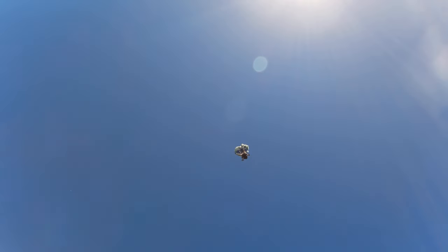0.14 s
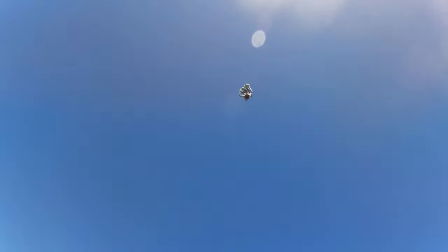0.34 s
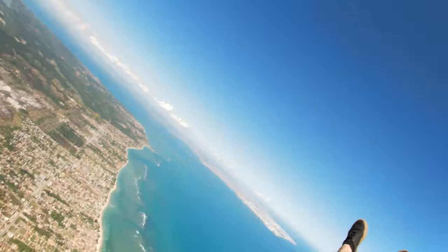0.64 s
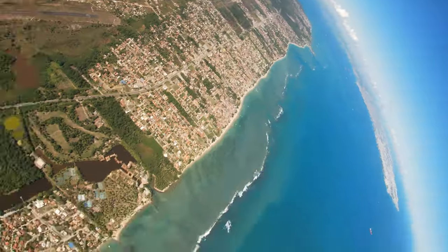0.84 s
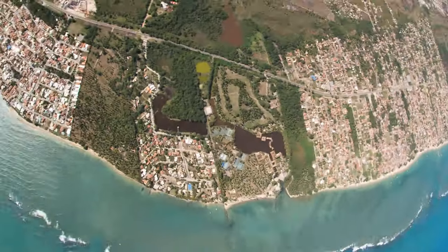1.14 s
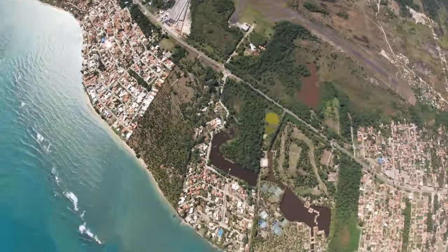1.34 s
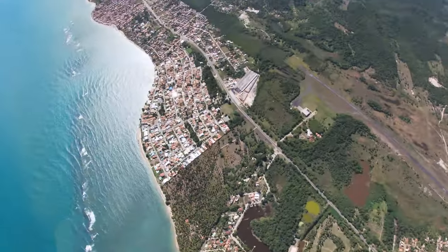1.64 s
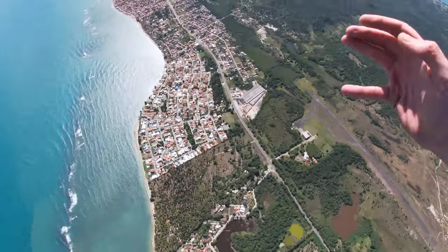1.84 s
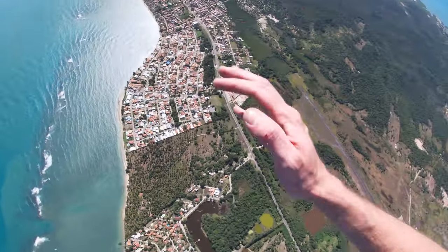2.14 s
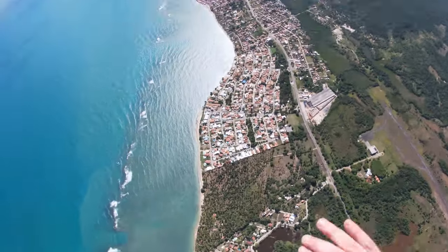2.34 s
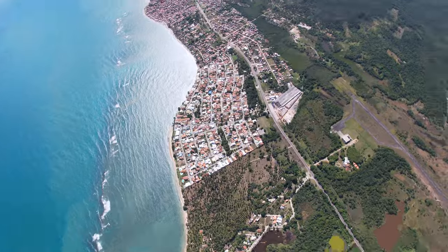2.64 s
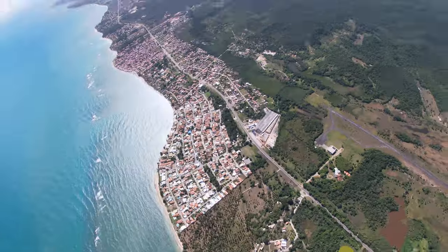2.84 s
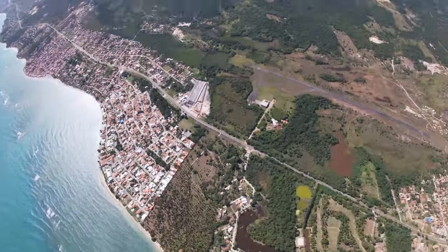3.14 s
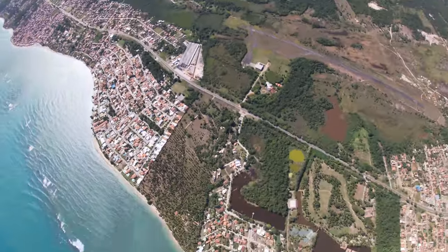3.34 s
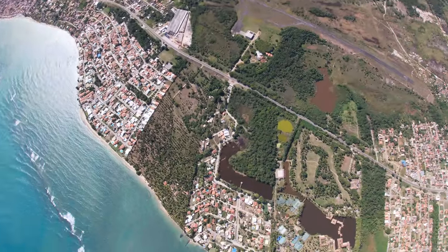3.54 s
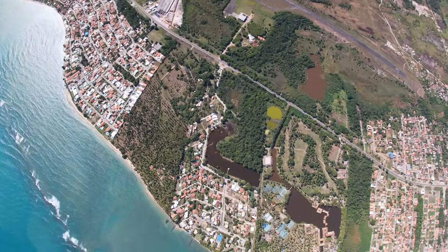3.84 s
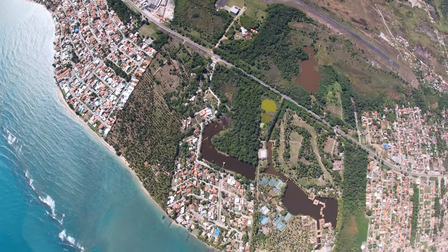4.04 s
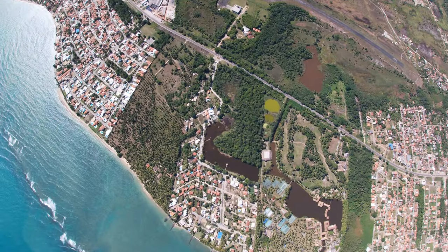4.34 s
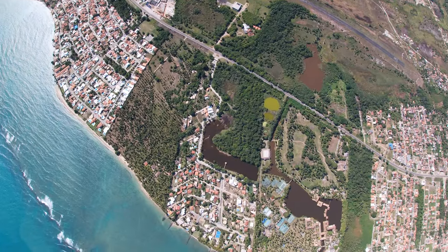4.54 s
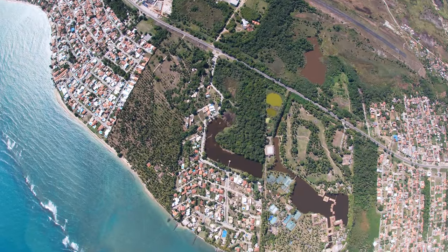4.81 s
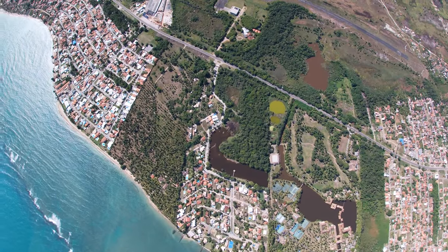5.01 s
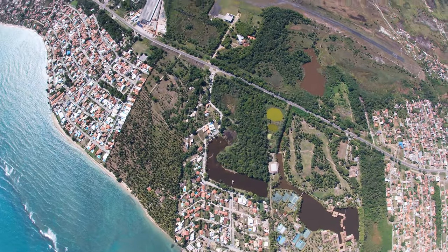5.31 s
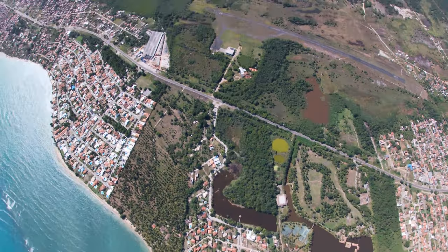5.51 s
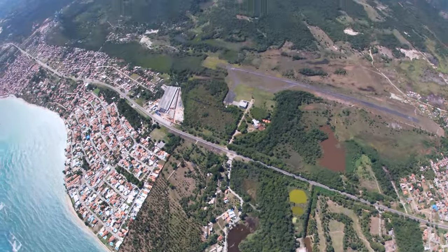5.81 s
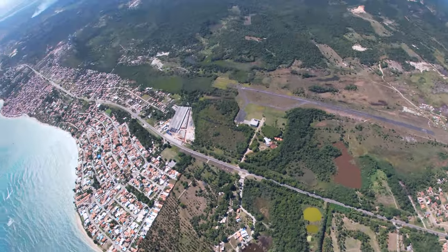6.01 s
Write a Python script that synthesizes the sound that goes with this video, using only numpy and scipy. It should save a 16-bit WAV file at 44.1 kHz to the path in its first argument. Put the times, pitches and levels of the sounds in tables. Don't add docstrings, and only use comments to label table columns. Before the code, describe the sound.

Air tears past a falling skydiver's microphone: rumbling, fluttering gusts, brief hollow moans and whistles, then a fuller, brighter continuous rush.

```python
import sys
import numpy as np
from scipy import signal
from scipy.fft import rfft, irfft, next_fast_len
from scipy.io import wavfile
from scipy.ndimage import uniform_filter1d

SR = 44100
rng = np.random.default_rng(int(sys.argv[2]) if len(sys.argv) > 2 else 0)


def level_to_linear(level):
    exponent = np.asarray(level, float) / 20
    return 10 ** exponent


def transcribe(u):
    v = np.clip(np.atleast_2d(u).T, -1, 1)
    q = np.round(v * 32767).astype(np.int16)
    wavfile.write(sys.argv[1], SR, q)


N = 272097
HOP = 16

# (frequency [Hz], density [dB per Hz])
WIND_SPECTRUM = [(12, -40), (20, -5.5), (92, 5), (201, -1.5), (366, -9), (648, -19), (1630, -28),
                 (2810, -34.5), (6880, -53.5), (12200, -68.5), (13200, -86)]
EDDY_HZ = (100, 350, 1300, 4400)
# (level [dB], share of buffet [dB/dB], of exposure [dB/dB], of lulls [dB/dB], of surges [dB/dB])
EDDIES = [
    (-15, 0.17, 0.11, 1., .02),
    (-18, 1., 0.016, .45, 0.24),
    (-25.5, .35, 0.71, 0.27, 0.98),
    (-36, .02, 0.98, .05, .3),
]
# (time [s], buffet [dB])
BUFFET = [(0, -1), (.25, 1.5), (.5, 4.5), (.86, 1), (.9, -7.5), (1.15, 1.5), (1.4, -6), (1.95, -3.5),
          (2.15, 3), (2.4, -1.5), (2.75, 7.5), (2.97, 4.5), (3.01, -2.5), (3.3, -9), (3.65, -9), (4.3, -2),
          (5.7, -2.5), (6.17, -2)]
# (time [s], exposure [dB])
EXPOSURE = [(0, -12), (.2, -9.5), (.62, -8.5), (.9, -17.5), (1.18, -18), (1.32, -6), (1.74, -11),
            (1.95, -1), (2.3, -5.5), (2.5, -7), (2.96, -12.5), (3.01, -16.5), (3.64, -13.5), (3.81, -0.5),
            (4.8, 2), (5.3, 7), (5.84, 8), (5.9, 0.4)]
# (arrival [s], rise [s], hold [s], fall [s], lift [dB])
SWEEPS = [(0.104, 0.012, .01, .05, 3), (0.275, 0.029, 0.11, .04, 12.5), (0.434, .04, 0.11, 0.036, 5.5),
          (0.705, .03, .04, .07, 5), (0.978, 0.048, 0.036, .1, 6.5), (1.502, 0.19, 0.099, 0.016, 6),
          (2.599, .08, 0.093, .07, 11.5), (3.669, .012, 0.037, 0.024, 4.5), (0.853, .01, 0.018, .01, 3),
          (2.794, .02, .08, .03, 1)]
# (start [s], length [s], depth [dB])
LULLS = [(.18, 0.015, -3), (0.65, 0.0096, -26), (0.662, 0.024, -8), (0.868, 0.037, -4), (1.03, .35, -7),
         (3.03, 0.055, -4.5), (2.35, .07, -5.5), (3.368, 0.042, -9.5), (3.69, .07, -4), (.95, .06, -3)]
# (arrival [s], rise [s], hold [s], fall [s], lift [dB])
SURGES = [(0.05, 0.035, 0.089, .03, 3), (0.205, 0.018, 0.043, .05, 7.5), (0.315, .04, .1, .03, 4),
          (0.473, .05, .12, .015, 6), (0.678, 0.037, 0.076, .03, -4.5), (1.029, 0.014, .05, .07, 7),
          (1.576, 0.087, 0.029, .015, 3), (1.66, .04, 0.18, .06, 2.5), (2.037, 0.052, 0.33, .04, 1.5)]
# (time [s], shedding rate [Hz], prominence [dB])
SHEDDING = [(0, 145, 4), (.29, 183, 2.5), (.6, 192, 2), (.8, 134, 10.5), (.92, 95, 3.5), (1.15, 196, 2.5),
            (1.33, 213, 2), (1.45, 124, -1.5), (2.2, 139, 1.5), (2.5, 120, 10), (2.8, 120, 1),
            (3.14, 125, 1), (3.5, 113, 4.5), (4.0, 178, 7), (4.75, 193, 6.5), (5.02, 126, 2.5),
            (5.55, 143, 5), (6.17, 114, 3.5)]
# (time [s], lift [dB])
TEARS = [(.029, 7), (0.046, 13), (0.062, 12), (.091, 4), (0.099, 16), (.135, 0), (.162, 18.5), (.196, 8),
         (0.211, 12), (.245, 9), (.258, -8), (0.273, 9), (0.698, 11), (.708, 6.5), (0.722, 12), (.734, 11),
         (0.753, 11.5), (.772, 9), (2.757, 3), (2.775, 10), (2.802, 13), (2.833, 10), (2.841, 2),
         (2.856, 9), (2.871, 7), (2.879, 8), (2.955, 5.5), (2.961, 10), (3.73, 3)]
# (time [s], peak level [dB], centre [Hz])
PUFFS = [(0.0633, -14.5, 1040), (0.0938, -22, 1020), (0.135, -14, 1040), (0.195, -32, 1080),
         (0.6813, -29, 1230), (0.8525, -27, 1010), (0.8654, -22, 1630), (1.011, -19, 1490),
         (1.0316, -21.5, 1260), (1.045, -26, 1780), (2.485, -19, 1160)]
# (start [s], length [s], first pitch [Hz], last pitch [Hz], level [dB])
WHISTLES = [
    (.676, .056, 1250, 1320, -31),
    (1.087, .089, 1860, 1890, -42),
    (.69, .05, 2050, 2050, -42),
    (1.145, .035, 720, 720, -34),
    (1.06, .15, 1150, 980, -41),
    (1.13, .15, 650, 540, -30),
    (.12, .5, 330, 340, -22),
    (2.7, .295, 520, 290, -20),
]

LULL_EDGE_S = .008
TEAR_RISE_S, TEAR_DECAY_S = .001, .0055
PUFF_T60_S = 0.047
PATCHY_DB, PATCHY_PER_DB = -1, 1.56
SHED_WANDER_DB = 2.56
WHISTLE_WIDTH_HZ, HOLLOW_HZ = 35, 600
PORT_HZ, PORT_WIDTH_HZ, PORT_DB = 6900, 500, -57.5
OVERLOAD = .92
MEMBRANE_HZ, MEMBRANE_RING = 6870, 0.64


def noise_band(hz, width_hz, size):
    f = np.fft.rfftfreq(size, 1 / SR)
    bell = np.exp(-((f - hz) / width_hz) ** 2)
    x = irfft(rfft(rng.standard_normal(size)) * bell, size)
    return x / np.std(x)


def walk(rate_hz):
    hold, count = int(SR / HOP / rate_hz), N // HOP + 1
    steps = np.repeat(rng.standard_normal(count // hold + 1), hold)
    x = uniform_filter1d(uniform_filter1d(steps, hold), hold)[:count]
    return x / np.std(x)


def swells(t, rows):
    total_db = 0
    for s, rise, hold, fall, db in rows:
        corners = np.cumsum([s - rise, rise, hold, fall])
        total_db = total_db + db * np.interp(t, corners, [0, 1, 1, 0])
    return total_db


def flow(t):
    buffet_db = np.interp(t, *np.transpose(BUFFET))
    exposure_db = np.interp(t, *np.transpose(EXPOSURE)) + swells(t, SWEEPS)
    lull_db = 0
    for s, length, db in LULLS:
        lull_db = lull_db + db * np.clip(np.minimum(t - s, s + length - t) / LULL_EDGE_S, 0, 1)
    return np.array([buffet_db, exposure_db, lull_db, swells(t, SURGES)])


def tears(t):
    total_db = 0
    for s, db in TEARS:
        rise = np.clip((t - s) / TEAR_RISE_S + 1, 0, 1)
        total_db = total_db + db * rise * np.exp(-np.abs(t - s) / TEAR_DECAY_S)
    return total_db


def port_hiss(size):
    exposure_db = uniform_filter1d(flow(np.arange(N) / SR)[1], size=9000)
    return level_to_linear(0.81 * exposure_db + PORT_DB) * noise_band(PORT_HZ, PORT_WIDTH_HZ, size)[:N]


def whistles():
    size = 32768
    out, t = np.zeros(N + size), np.arange(size) / SR
    for start, length, first_hz, last_hz, db in WHISTLES:
        gate = np.clip(np.minimum(t, length - t) / .008, 0, 1)
        pitch_hz = np.interp(t, [0, length], [first_hz, last_hz])
        phase = 2 * np.pi * np.cumsum(pitch_hz) / SR
        width_hz = WHISTLE_WIDTH_HZ * (1 + 2 * HOLLOW_HZ / first_hz)
        cos_part = noise_band(0, width_hz, size)
        sin_part = noise_band(0, width_hz, size)
        tone = cos_part * np.cos(phase) + sin_part * np.sin(phase)
        i = int(start * SR)
        out[i:i + size] += level_to_linear(db) * gate * tone
    return out[:N]


def puffs():
    size = 8192
    out, t = np.zeros(N + size), np.arange(size) / SR
    shape = (1 - np.exp(-t / 0.001)) * level_to_linear(-60 * t / PUFF_T60_S)
    for s, db, hz in PUFFS:
        i = int(s * SR)
        out[i:i + size] += level_to_linear(db - 3) * shape * noise_band(hz, .35 * hz, size)
    return out[:N]


def wind(size):
    t = np.arange(N // HOP + 1) * HOP / SR
    controls = flow(t)
    buffet_db, exposure_db = controls[:2]
    patchy = np.clip(PATCHY_DB + PATCHY_PER_DB * (buffet_db - exposure_db), .5, 2.5)
    bursts = .3 * walk(25) + 0.25 * walk(70) + 0.17 * walk(220)
    tear_db = tears(t)

    shed_s, shed_hz, shed_db = np.transpose(SHEDDING)
    shed_hz = np.interp(t, shed_s, shed_hz)
    shed_db = np.interp(t, shed_s, shed_db) + SHED_WANDER_DB * walk(6.08)

    spectrum_hz, density_db = np.transpose(WIND_SPECTRUM)
    centres = 22 * 2 ** (np.arange(29) / 3)
    band_db = np.interp(np.log(centres), np.log(spectrum_hz), density_db) + 10 * np.log10(centres)
    anchor_db = np.interp(np.log(EDDY_HZ), np.log(centres), band_db)
    level_db, *shares = np.transpose(EDDIES)

    out, neighbours = np.zeros(N), walk(22)
    for hz, own_db in zip(centres, band_db):
        def at_size(column):
            return np.interp(np.log(hz), np.log(EDDY_HZ), column)

        db = at_size(level_db - anchor_db) + np.array([at_size(share) for share in shares]) @ controls
        diffuse = np.clip(np.log2(hz / 4500) / 0.83, 0, .7)
        slow_db = 0.88 * uniform_filter1d(db, size=400) + 0.2 * np.mean(db)
        db += diffuse * (slow_db - db)
        db += shed_db * np.exp(-(np.log2(hz / shed_hz) / 0.5) ** 2)
        small = np.clip(np.log2(hz / 300) / 2.63, 0, 1)
        neighbours = 0.31 * neighbours + 0.5 * walk(25)
        torn_db = (1 - diffuse) * (patchy * bursts + small * tear_db)
        flicker_db = small * (torn_db + 1.5 * neighbours)
        gain = np.interp(np.arange(N) / SR, t, level_to_linear(own_db - 8.5 + db + flicker_db))
        out += gain * noise_band(hz, 0.21 * hz, size)[:N]
    return out


def scene():
    size = next_fast_len(N)
    return (port_hiss(size) + whistles() + puffs() + wind(size))[None, :]


def roll_off(x):
    return signal.sosfilt(signal.butter(12, 13360, fs=SR, output="sos"), x)


def record(dry):
    wet = OVERLOAD * np.tanh(dry / OVERLOAD)
    w = 2 * SR * np.tan(np.pi * MEMBRANE_HZ / SR)
    membrane = signal.bilinear([w ** 2], [1, w / MEMBRANE_RING, w ** 2], SR)
    wet = signal.lfilter(*membrane, wet)
    n = np.arange(N)
    edges = np.clip(np.minimum(N - n, 5 * n + 40) / 100, 0, 1)
    return roll_off(wet * edges)


dry = scene()
out = record(dry)
transcribe(out)
```